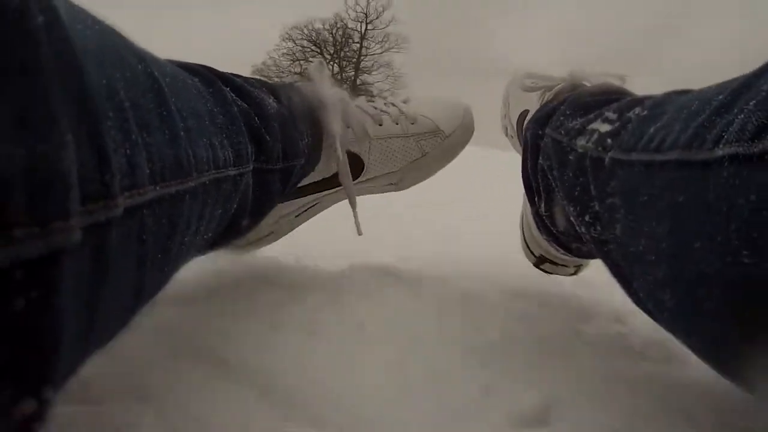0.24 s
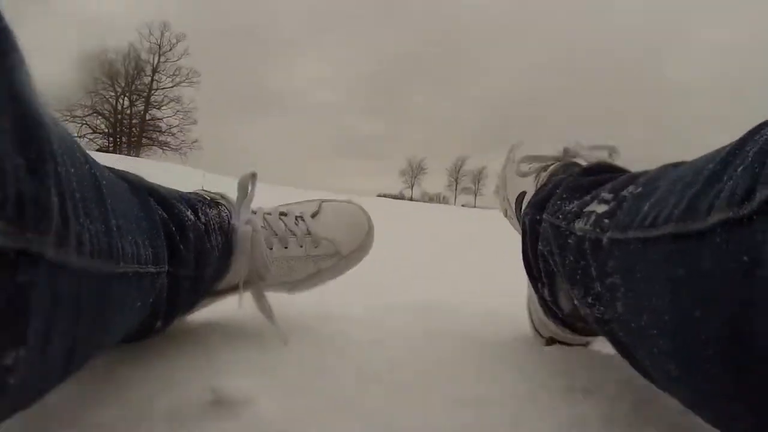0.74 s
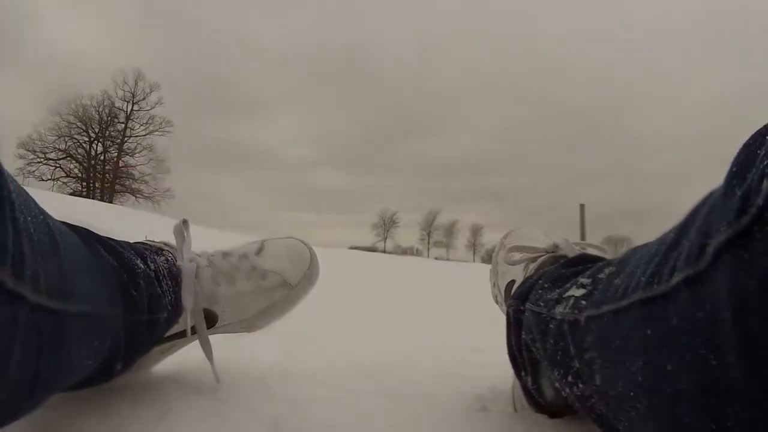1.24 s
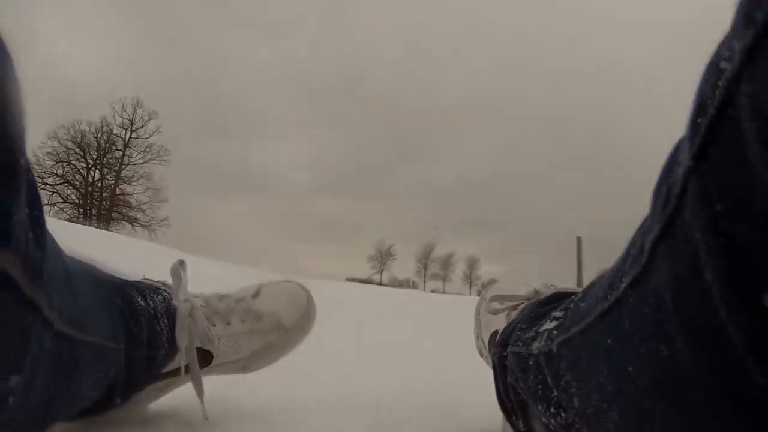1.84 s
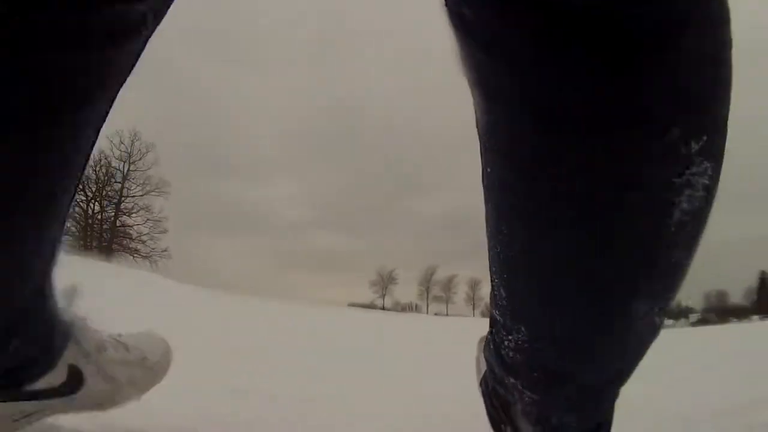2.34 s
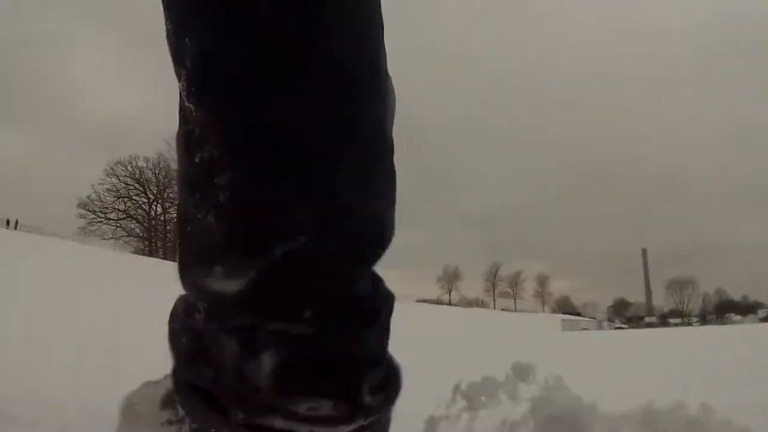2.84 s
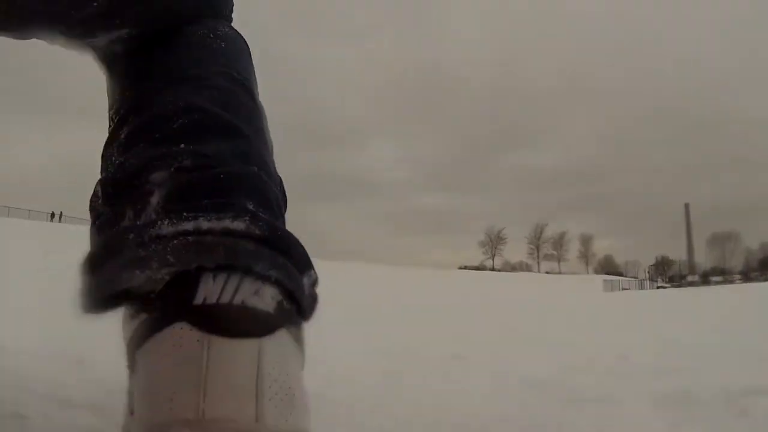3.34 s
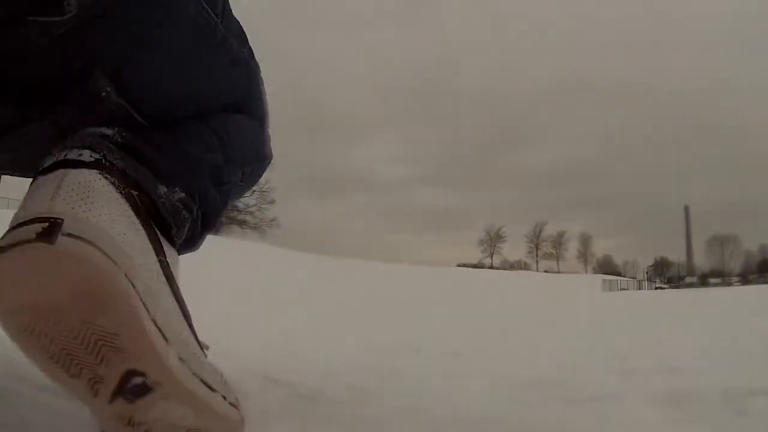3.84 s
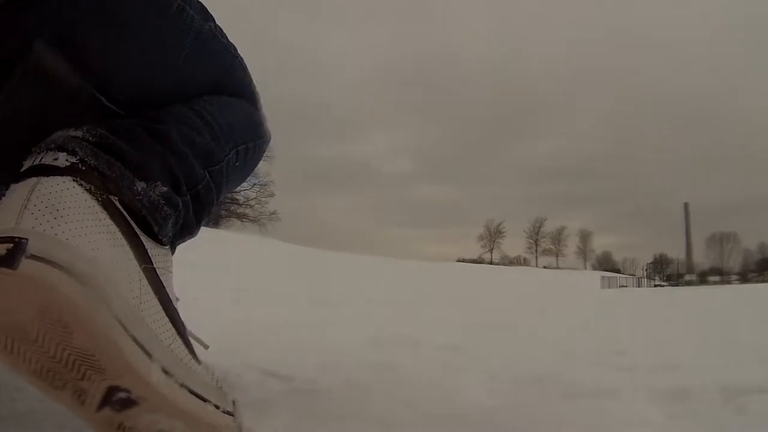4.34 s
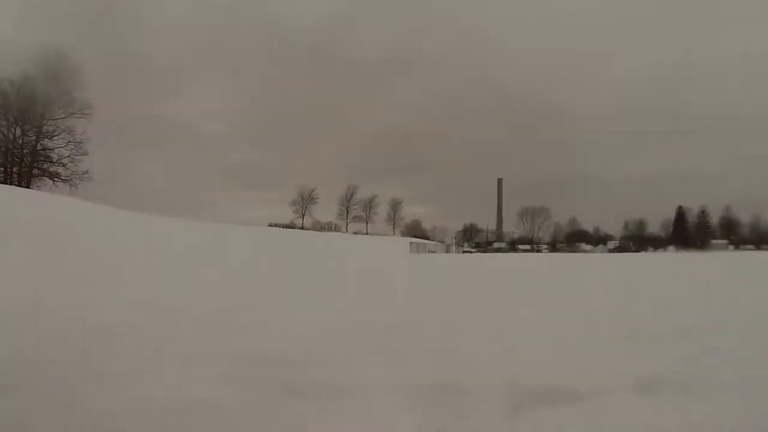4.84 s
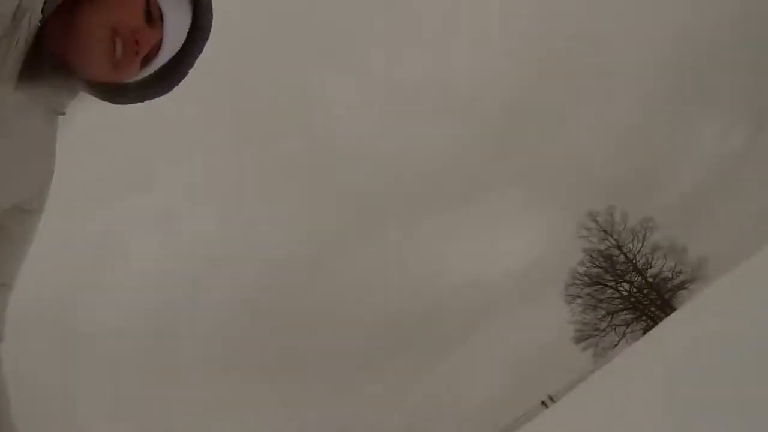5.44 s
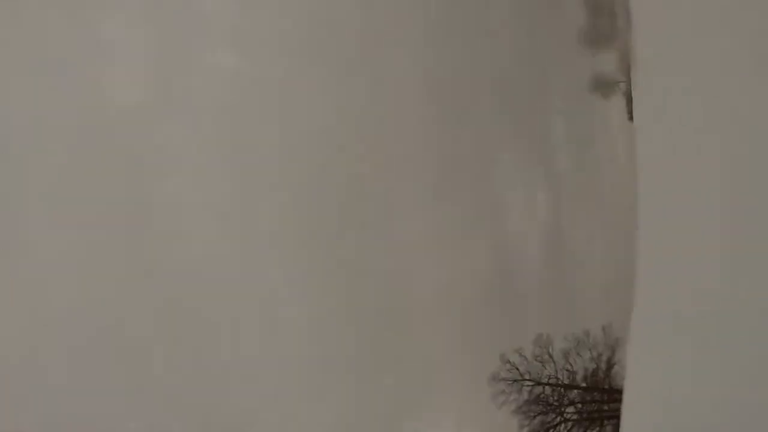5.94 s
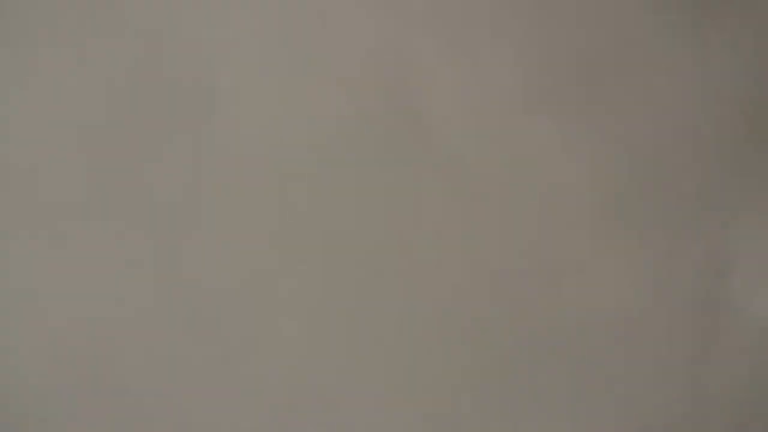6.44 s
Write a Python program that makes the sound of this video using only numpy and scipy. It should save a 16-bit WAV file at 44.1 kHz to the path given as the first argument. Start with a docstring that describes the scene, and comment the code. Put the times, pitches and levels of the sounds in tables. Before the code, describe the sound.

A sled scrapes over packed snow in uneven surges, with crunching lumps, hard hollow knocks, deep bump thumps and low wind rumble, heard from a closed case.

```python
"""From the start a sled scrapes over packed snow in surges, heard inside a hard camera case riding on it:
snapping crystals and friction, filtered by case resonances near 1.35 and 1.9 kHz, over rumbling sway and wind.
Bumps thump as single heaves, lumps crunch as grain bursts and powder fizzes; from 0.5 s hard knocks ring the hull
as dying modes, the strongest at 0.7 s overloading the recorder. Sharp ticks, dying modes with a noise click, come
sparsely from 1.5 s. A wavering 80 Hz hull shudder comes in after 4 s; ticks crowd together from 6.3 s."""
import sys
import numpy as np
from scipy import signal
from scipy.fft import rfft, irfft
from scipy.io import wavfile
from scipy.ndimage import uniform_filter1d

SR = 44100
rng = np.random.default_rng(int(sys.argv[2]) if len(sys.argv) > 2 else 0)


def unload_wav(signal):
    """Save mono or channel-first audio to the path in sys.argv[1] as 16-bit WAV at rate SR, clipped to [-1, 1]."""
    wavfile.write(
        sys.argv[1],
        SR,
        np.round(np.clip(np.atleast_2d(signal).T, -1, 1) * 32767).astype(np.int16),
    )


N = 294588

# hull bites, bears down or eases off, lifts clear:
# start_s, length_s, level_db, swell_start_to_end_db, low_grind_re_level_db, bright_hiss_re_level_db
SCRAPES = [ (0.0, 0.13, -20, -2, -4, -12), (0.134, 0.072, -30, -2, -6, -14),
           (0.187, 0.31, -23.5, 9, -5.5, -11), (0.54, 0.042, -29.5, -1, 0, -12.5),
           (0.586, 0.1, -21.5, 7, -7, -12), (0.733, 0.048, -37, 5, -3, -7),
           (0.798, 0.035, -26.5, 2, -9, -14), (0.86, 0.096, -28, 2, -5.5, -15.5),
           (1.033, 0.075, -46.5, -6, 1.5, -13), (1.145, 0.17, -39, -8.5, -5, -13.5),
           (1.343, 0.19, -43, 5, -3, -14.5), (1.593, .12, -41, -2, -2, -17),
           (1.775, 0.23, -28.5, 7.5, -1.5, -12.5), (2.051, 0.11, -27.5, 5, 0, -4),
           (2.184, 0.04, -40.5, 3, -4, -13), (2.286, 0.043, -45.5, 12, -1.5, -15),
           (2.368, 0.0093, -42, -4, 2.5, -11), (2.445, .07, -57.5, -9, 6, -3.5),
           (2.534, 0.0096, -36.5, -1.5, 2.5, -12), (2.62, 0.11, -33, 1.5, 0.5, -14.5),
           (2.74, 0.2, -49, 8, 8, -3), (2.864, 0.33, -29.5, -8.5, -3.5, -14),
           (3.228, 0.032, -24.5, -4.5, -5, -15), (3.315, 0.2, -23.5, 5, -9, -14.5),
           (3.613, 0.11, -40, 16, -2, -13), (3.678, 0.11, -33.5, 3, -5, -15.5),
           (3.819, 0.007, -23.5, -7.5, -23, -16.5), (3.857, .04, -47, 7, -2, -13),
           (3.961, 0.083, -43, 12, -3.5, -14), (4.091, 0.08, -22, 8.5, -3, -14),
           (4.213, 0.15, -31.5, 6, -12, -11.5), (4.383, 0.036, -25, -3, -7, -12.5),
           (4.504, 0.19, -28.5, -3.5, -1.5, -15), (4.646, 0.12, -17.5, 3.5, -4.5, -14.5),
           (4.79, 0.1, -18, 8.5, -4, -13.5), (4.915, 0.015, -39, 17, 6.5, -9),
           (4.971, .11, -32.5, -5, -3.5, -12.5), (5.118, 0.13, -25.5, 1.5, -3.5, -12),
           (5.348, 0.042, -47, -6, 1, -12.5), (5.418, 0.05, -37.5, 1.5, -3.5, -12),
           (5.507, 0.011, -26, -10.5, 4, -15.5), (5.574, 0.052, -32.5, -14.5, -2.5, -17),
           (5.646, 0.07, -40.5, 13, -4, -15.5), (5.726, 0.076, -25, 1.5, -4, -17.5),
           (5.859, 0.093, -25.5, 1, -2.5, -18), (5.985, 0.05, -55, -2, 14.5, -9),
           (6.16, 0.11, -44.5, -4, 0.5, -15.5), (6.352, 0.25, -56, -8, 11, -12),
           (6.6, 0.094, -38.5, -1, -7, -18)]
# fast gliding sings, slow ploughing crunches: time_s, extra_wall_ring_db, clumping_db (before CLUMP_SHARE)
GLIDE = [(0, -3.5, 5.5), (.45, 5, -4.5), (.65, 4, 5.5), (.95, 10.5, 0), (1.2, -15.5, 4), (2.1, -2.5, 2.5),
         (2.9, -9, 5), (3.4, -2, 2), (4.2, -3.5, 5), (4.8, -7, 2.5), (5.8, -11, 5), (6.6, -8, 12)]
# icy crust whistling past: peak_s, upper_ring_lift_db, half_length_s
CRUST_PATCHES = [(0.416, 3, .04), (0.934, 1, 0.048), (2.116, 1.5, 0.08)]
# snow noise, relative density: freq_hz, density_db_per_hz
SNOW_SPECTRUM = [(100, 5), (220, 3), (400, -4.5), (600, -9.5), (1000, 4.5), (2200, -2.5), (2600, -7),
                 (3300, -15), (5300, -19.5), (5900, -29), (7300, -33.5), (8300, -41), (12000, -45),
                 (15500, -61.5)]
# camera case resonances and dips: freq_hz, width_hz, lift_db
CASE_MODES = [(540, 520, 6.5), (736, 76, 6), (1028, 114, -6.5), (1368, 150, 6), (1532, 54, -8),
              (1805, 340, 6), (2030, 230, 5.5), (4420, 690, 3), (6810, 1800, 15), (9200, 2200, -3.5),
              (11000, 2000, 11)]
# snow lumps collapsing under the hull: start_s, nominal_level_db, length_s
CRUNCHES = [(0.108, -13, 0.0078), (0.203, -17.5, 0.029), (0.805, -28, 0.0069), (1.168, -29.5, 0.049),
            (1.6, -35, 0.0074), (1.608, -25.5, 0.014), (2.864, -18, 0.025), (2.887, -29, 0.016),
            (2.951, -19, 0.021), (3.061, -19.5, 0.016), (3.717, -30, .008), (3.816, -23.5, 0.0086),
            (4.386, -19, 0.017), (4.47, -28, 0.017), (4.524, -23.5, 0.021), (5.252, -12.5, 0.014),
            (5.556, -22, 0.011), (5.849, -19, 0.014)]
# powder clouds thrown on the case: peak_s, level_db (before FIZZ_DB), build_up_db_per_s, settling_db_per_s
PUFFS = [(0.0, -67, 300, 70), (0.68, -61, 40, 400), (1.22, -62, 188, 140), (2.16, -51.5, 65, 550),
         (4.88, -74, 17, 487)]
# snow rubbing on the case: start_s, length_s, level_db (before SHRILL_DB), swell_db
RUBS = [(0.0, 0.3, -45, -12), (3.201, .003, -42, -10), (4.661, 0.12, -29.5, -3), (4.835, 0.046, -38, 16)]
# powder fizz, relative density: freq_hz, density_db_per_hz
POWDER_SPECTRUM = [(3000, -20), (5000, -7.5), (7500, -8), (9000, -9), (11200, -10.5), (12500, -14),
                   (14200, -25), (15500, -22.5)]
# shrill case modes: freq_hz, width_hz, level_db
SHRILL_MODES = [(6900, 670, 7), (10870, 1500, -13)]
# hard knocks: start_s, strength_db, contact_s, spot_pitch_hz, spot_ring_re_blow_db, crunch_db
KNOCKS = [(0.5062, 0, 0.000055, 864, -8.5, -9), (0.6982, 9, 0.00015, 371, -7.5, -1.5),
          (0.8357, -1.5, 0.000056, 697, -10, -26), (1.624, -15, 0.0019, 330, -24, -23),
          (1.9965, -2, 0.0006, 830, -2, -12), (2.161, -15, 0.001, 230, 0.5, -18.5),
          (3.059, -7, 0.000052, 823, -5, -18), (4.172, -13.5, 0.000077, 282, -3, -17),
          (5.2675, -8, 0.0008, 200, -8, -7), (5.498, -25, 0.00022, 750, -9, -15.5),
          (6.228, 0, 0.0013, 777, -7, -17.5)]
# hull modes under a blow, before random variation: freq_hz, level_db, t60_s
HULL_MODES = [(262, -3.5, 0.022), (358, -2.5, 0.016), (474, -0.5, 0.012), (634, -1, 0.017),
              (756, 2.5, 0.0069), (1027, 2.5, 0.0075), (1323, -4, 0.018), (1987, -1, 0.015),
              (2990, -17, 0.021)]
# the shut case muffles the top of every blow: freq_hz, gain_db
CASE_LOSS = [(7200, -1), (8500, -2.5), (12000, -9), (15500, -26)]
# soft thumps over bumps: centre_s, peak_db (before THUMP_DB), pitch_hz
THUMPS = [(0.122, -7.5, 70.5), (0.226, -8, 65), (0.514, -4, 53.7), (0.561, -11.5, 132), (0.864, -10, 61.6),
          (1.212, -7, 61.4), (1.451, -8.5, 48.7), (1.525, -5, 75.6), (1.6275, -3, 77), (2.012, -3.5, 77),
          (2.168, -2.5, 81.7), (2.633, -6.5, 56.6), (2.89, -5.5, 113), (2.96, -8, 72), (3.527, -3, 64.4),
          (4.181, -2, 70.4), (4.498, -5, 63), (4.593, -6.5, 69), (4.748, -10, 69), (4.906, -1.5, 63),
          (4.928, -5.5, 123), (5.277, -4.5, 76.5), (5.52, -4, 69.4), (5.587, -7, 88), (5.625, -7.5, 55.4),
          (5.868, -3, 61), (6.2358, -2.5, 78.6), (6.541, -4.5, 66), (6.611, -14, 71)]
# ticks of the mount and icy crumbs; the one at 6.54 s is likely a thump overloading the recorder:
# start_s, peak_db, edge_click_re_ring_db
TICKS = [(1.525, -28, -6), (1.626, -30, -18), (2.531, -38, -15), (2.618, -22, -13), (2.624, -19.5, -8),
         (3.206, -18, -6.5), (3.719, -33, -22), (3.859, -29.5, -16), (3.887, -33.5, -5), (6.277, -42, -7),
         (6.384, -19, -25), (6.416, -29.5, -29), (6.4523, -21.5, -31), (6.5057, -40, -24),
         (6.521, -25, -24), (6.54, -34.5, 0), (6.562, -35, -26)]
# mount modes, before random variation: freq_hz, level_db, t60_s
MOUNT_MODES = [(777, -9.5, 0.031), (1213, -9, 0.016), (1260, 0, 0.028), (1910, -5, 0.027),
               (2360, -7, 0.0065), (4300, -44, .008)]
# click of a hard edge, relative density: freq_hz, density_db_per_hz
EDGE_SPECTRUM = [(500, -10), (2000, 15.5), (7000, 3), (14000, -23)]
# slow sway: time_s, level_db (before SWAY_DB)
SWAY_LEVELS = [(0.0, -27), (0.15, -21.5), (0.82, -36.5), (0.87, -20.5), (1.39, -45.5), (1.47, -24),
               (1.99, -39), (2.19, -21.5), (3.91, -18.5), (4.09, -37), (4.15, -19), (5.19, -25.5),
               (5.26, -10.5), (5.36, -56), (5.54, -25), (6.16, -26.5), (6.27, -22), (6.68, -18.5)]
# sway noise, relative density: freq_hz, density_db_per_hz
SWAY_SPECTRUM = [(1, -53), (5, -24.5), (12, -11), (22, -1), (33, 7.5), (48, 0), (62, -7), (90, -61.5),
                 (200, -88.5)]
# wind on the case: time_s, level_db (before gusts)
WIND_LEVELS = [(0.0, -28.5), (0.46, -18), (0.65, -28.5), (1.1, -36), (1.21, -49), (2.1, -23.5), (2.29, -28),
               (2.55, -46), (2.77, -34.5), (3.64, -22.5), (4.18, -32.5), (4.35, -30), (4.78, -20.5),
               (5.08, -34.5), (6.08, -27.5), (6.23, -33.5), (6.46, -28), (6.68, -21)]
# buffeting noise, relative density: freq_hz, density_db_per_hz
BUFFET_SPECTRUM = [(35, -3.5), (55, 5), (72, 3), (100, -10), (140, -17.5), (200, -24.5), (330, -31.5),
                   (700, -45.5), (2000, -80)]
# free shudder of the hull: time_s, rms_level_db
SHUDDER_LEVELS = [(4.0, -68), (4.25, -33), (4.9, -32.5), (5.28, -27), (5.42, -36), (5.6, -34), (6.0, -25.5),
                  (6.3, -40), (6.68, -25)]

TIME_S = np.arange(N) / SR
CLOCK_S = TIME_S[::32]  # coarse time for envelopes
BLOW_S = np.arange(4096) / SR  # time within one short event
HZ = np.fft.rfftfreq(N, 1 / SR)

BITE_DB_PER_S, LIFT_DB_PER_S = 899, 620  # onset of a brief contact; release of any contact
GENTLE_S = 0.19  # contacts much longer than this ease in slowly
SETTLE_DB, SETTLE_DB_PER_S = -29, 85  # loose snow rustles on after the lift
JUDDER_DB, JUDDER_HZ = 0.5, 30  # uneven snow shakes the pressure
CLUMP_SHARE = 0.44
MIDDLE_DB, GRIND_DB, HISS_DB = -1.5, -2.24, 0.2
GRIND_EDGE_HZ, HISS_EDGE_HZ = 980, 2440
WALL_HZ, WALL_WIDTH_HZ = 1940, 390
CRUST_HZ, CRUST_WIDTH_HZ, CRUST_REST_DB = 4650, 540, -22.5
FLOOR_DB = -55.5  # faint creep of snow that never stops
FIZZ_DB, SHRILL_DB, THUMP_DB, SWAY_DB = 6, -2.0, -4.0, 0.73
GUST_DB, GUST_HZ = 5.5, 5.1  # the wind comes in lumps
DRAG_DB = -4  # low buffeting re the scrape that drives it
JOLT_DB, JOLT_S = -10.5, 0.02  # shaking around a thump: re its table level; half length
SHUDDER_HZ, SHUDDER_WANDER_HZ = 80, 2
BAND_EDGE_HZ = 15500


def scrape(middle_gain, grind_gain, hiss_gain, patchy_db=3.0):
    """The hull grinds over snow: deep snow gives more grind, icy crust more hiss."""
    wall_db, clump_db = curves(GLIDE)
    grains = crunch(per_s=2200, spread_db=0.0, smooth_db=0, clump_db=CLUMP_SHARE * clump_db, clump_hz=94)
    snow = patchy(in_case(grains), patchy_db)
    wall = resonate(snow, bell(WALL_HZ, WALL_WIDTH_HZ))
    crust = resonate(snow, bell(CRUST_HZ, CRUST_WIDTH_HZ))
    crust_gain = amp(CRUST_REST_DB) + together([hump(*row) for row in CRUST_PATCHES])

    upper = above(snow, GRIND_EDGE_HZ)
    top = above(snow, HISS_EDGE_HZ)
    middle = steadied(upper - top + amp(wall_db) * wall, samples=1600)
    grind = steadied(snow - upper, samples=1300)
    hiss = steadied(top + crust_gain * crust, samples=1300)

    sliding = amp(MIDDLE_DB) * middle_gain * middle
    sliding += amp(GRIND_DB) * grind_gain * grind
    sliding += amp(HISS_DB) * hiss_gain * hiss
    creep = amp(FLOOR_DB) * in_case(rng.standard_normal(N))
    return sliding + creep


def pressure():
    """Envelopes of the scraping's middle, low grind and bright hiss, sharing one judder."""
    gains = np.array([contact(*row[:4]) for row in SCRAPES])
    *_, grind_db, hiss_db = np.transpose(SCRAPES)
    grind_gains = gains * amp(grind_db)[:, None]
    hiss_gains = gains * amp(hiss_db)[:, None]
    judder = amp(JUDDER_DB * wander(JUDDER_HZ))
    return [judder * together(band) for band in (gains, grind_gains, hiss_gains)]


def contact(start_s, length_s, level_db, swell_db):
    """Gain of one contact with the snow: a bite, a steady swell or fade, a quick lift and a faint rustle."""
    t = CLOCK_S - start_s
    before_s = np.maximum(-t, 0)
    after_s = np.maximum(t - length_s, 0)
    held_db = level_db + swell_db * (np.clip(t / length_s, 0, 1) - 0.5)
    bite_db = -before_s * BITE_DB_PER_S / (1 + (length_s / GENTLE_S) ** 2)
    lift_db = np.maximum(-LIFT_DB_PER_S * after_s, SETTLE_DB - SETTLE_DB_PER_S * after_s)
    return amp(held_db + bite_db + lift_db)


def crunch(per_s, spread_db, smooth_db, clump_db, clump_hz):
    """Snow crystals snapping in clumps over smooth friction."""
    struck = rng.random(N) < per_s / SR
    sign = rng.choice([-1, 1], N)
    size_db = spread_db * np.minimum(rng.exponential(1, N), 4)
    snaps = evened(struck * sign * amp(size_db))
    friction = amp(smooth_db) * rng.standard_normal(N)
    return evened((snaps + friction) * amp(clump_db * wander(clump_hz)))


def in_case(x):
    """Snow noise as it sounds through the resonant camera case."""
    case_db = sum(lift_db * bell(hz, width_hz) for hz, width_hz, lift_db in CASE_MODES)
    return evened(colour(x, spectrum(SNOW_SPECTRUM) + case_db))


def patchy(x, depth_db, frames=7):
    """Each lump of snow briefly favours its own pitches; the fine hiss above them stays smoother."""
    hz, _, z = signal.stft(x, SR, nperseg=512, noverlap=384)
    patches = rng.standard_normal(z.shape[::-1]).T
    for _ in range(2):
        patches = uniform_filter1d(patches, size=frames, axis=1)
        patches = uniform_filter1d(patches, size=3, axis=0)
    z = z * amp(depth_db * evened(patches) / (1 + (hz[:, None] / 3500) ** 2))
    return signal.istft(z, SR, nperseg=512, noverlap=384)[1][:N]


def knocks(crunch_s=0.0044, spot_t60_s=0.034):
    """Hard lumps strike the hull and are crushed; each spot has its own note, longer contact sounds duller."""
    out, t = np.zeros(N), BLOW_S
    crushed = in_case(rng.standard_normal(N))
    for start_s, strength_db, contact_s, spot_hz, spot_db, crunch_db in KNOCKS:
        push = np.exp(-t / contact_s)
        blow = signal.fftconvolve(ring(HULL_MODES, t), push)[:len(t)]
        blow /= abs(blow).max()
        spot = ring([(spot_hz, 0, spot_t60_s)], t) * (1 - push)
        burst = crushed[round(start_s * SR):][:len(t)] * np.exp(-t / crunch_s)
        add(out, start_s, amp(strength_db) * (blow + amp(spot_db) * spot) + amp(crunch_db) * burst)
    return colour(out, spectrum(CASE_LOSS))


def thumps():
    """Each bump heaves the sled once: a push between two softer rebounds."""
    out = np.zeros(N)
    half = len(BLOW_S) // 2 / SR
    for centre_s, peak_db, pitch_hz in THUMPS:
        u = np.pi * pitch_hz * (BLOW_S - half)
        heave = (2 * u ** 2 - 1) * np.exp(-u ** 2)
        add(out, centre_s - half, amp(peak_db) * heave)
    return amp(THUMP_DB) * out


def crunches(rise_s=0.0033):
    """A lump gives way in a quick rush of coarse grains."""
    envelope, t = np.zeros(N), BLOW_S
    for start_s, level_db, length_s in CRUNCHES:
        rush = (1 - np.exp(-t / rise_s)) * np.exp(-(t / length_s) ** 2)
        add(envelope, start_s, amp(level_db) * rush)
    grains = crunch(per_s=1000, spread_db=5.5, smooth_db=1.5, clump_db=3.5, clump_hz=150)
    return envelope * steadied(in_case(grains), samples=600)


def spray():
    """Fine powder fizzes against the case; where it rubs hard, the case rings shrilly."""
    grains = crunch(per_s=2600, spread_db=5.5, smooth_db=2.0, clump_db=2.4, clump_hz=60)
    fizz = evened(colour(grains, spectrum(POWDER_SPECTRUM)))
    modes = sum(amp(level_db) * bell(hz, width_hz) for hz, width_hz, level_db in SHRILL_MODES)
    shrill = evened(resonate(grains, modes))
    powder = together([puff(*row) for row in PUFFS])
    rubbing = together([contact(*row) for row in RUBS])
    return amp(FIZZ_DB) * powder * fizz + amp(SHRILL_DB) * rubbing * shrill


def puff(peak_s, level_db, build_db_per_s, settle_db_per_s):
    """Gain of one powder cloud: builds up and settles at steady dB rates."""
    t = CLOCK_S - peak_s
    return amp(level_db - np.maximum(-build_db_per_s * t, settle_db_per_s * t))


def ticks(edge_s=0.002):
    """Small sharp ticks: dying mount modes plus a short noise click of the edge."""
    out, t = np.zeros(N), BLOW_S
    grit = evened(colour(rng.standard_normal(N), spectrum(EDGE_SPECTRUM)))
    for start_s, peak_db, edge_db in TICKS:
        edge = grit[round(start_s * SR):][:len(t)] * np.exp(-t / edge_s)
        add(out, start_s, amp(peak_db) * (ring(MOUNT_MODES, t) + amp(edge_db) * edge))
    return colour(out, spectrum(CASE_LOSS))


def rumble(drag):
    """The sled sways; wind, drag and every bump buffet the case; the hull shudders at its own pitch."""
    sway = steadied(colour(rng.standard_normal(N), spectrum(SWAY_SPECTRUM)), samples=3000)
    sway_gain = amp(curves(SWAY_LEVELS)[0] + SWAY_DB)

    buffet = steadied(colour(rng.standard_normal(N), spectrum(BUFFET_SPECTRUM)), samples=2000)
    wind = amp(curves(WIND_LEVELS)[0] + GUST_DB * wander(GUST_HZ))
    jolts = together([hump(centre_s, peak_db + JOLT_DB, JOLT_S) for centre_s, peak_db, _ in THUMPS])
    shaking = np.sqrt(wind ** 2 + (amp(DRAG_DB) * drag) ** 2 + jolts ** 2)

    pitch_hz = SHUDDER_HZ * (1 + 0.02476 * wander(SHUDDER_WANDER_HZ))
    shudder = np.sqrt(2) * np.sin(2 * np.pi * np.cumsum(pitch_hz) / SR)
    return sway_gain * sway + shaking * buffet + amp(curves(SHUDDER_LEVELS)[0]) * shudder


def ring(modes, t, vary_db=1.65):
    """Dying modes after a blow, varied each time; neighbours swing in opposite directions. Peak 1."""
    x = np.zeros(len(t))
    for k, (hz, level_db, t60_s) in enumerate(modes):
        fade = amp(level_db + vary_db * rng.normal() - 60 * t / t60_s)
        varied_hz = hz * rng.uniform(0.97, 1.01)
        x += (-1) ** k * fade * np.sin(2 * np.pi * varied_hz * t)
    return x / abs(x).max()


def bell(hz, width_hz):
    """Shape of one resonance over all frequencies, top 1."""
    return 1 / (1 + (2 * (HZ - hz) / width_hz) ** 2)


def resonate(x, gain):
    """Filters by a linear gain for every frequency."""
    return irfft(rfft(x) * gain, N)


def colour(x, gain_db):
    """Filters by a gain in dB for every frequency."""
    return resonate(x, amp(gain_db))


def above(x, edge_hz):
    """The part of x over a smooth crossover."""
    return resonate(x, 1 - 1 / (1 + (HZ / edge_hz) ** 8))


def spectrum(points):
    """A dB table read on a log-frequency axis."""
    hz, db = np.transpose(points)
    return np.interp(np.log(HZ + 1), np.log(hz), db)


def curves(rows):
    """Each column of a time table, sample by sample."""
    time_s, *columns = np.transpose(rows)
    return [np.interp(TIME_S, time_s, column) for column in columns]


def hump(peak_s, level_db, half_s):
    """Gain of a rounded swell."""
    return amp(level_db) * np.exp(-((CLOCK_S - peak_s) / half_s) ** 2)


def together(gains):
    """Adds envelopes by their power, sample by sample."""
    return np.interp(TIME_S, CLOCK_S, np.sqrt(np.sum(np.square(gains), axis=0)))


def wander(rate_hz):
    """Smooth random drift of rms 1, mostly below the given rate."""
    return evened(resonate(rng.standard_normal(N), 1 / (1 + (HZ / rate_hz) ** 4)))


def steadied(x, samples):
    """Evens out the slow swells of a noise, leaving its quick ones."""
    power = uniform_filter1d(uniform_filter1d(x ** 2, samples), samples)
    return evened(x / np.sqrt(abs(power) + 1e-12))


def evened(x):
    """Scales to rms 1."""
    return x / np.sqrt(np.mean(x ** 2) + 1e-20)


def amp(db):
    """Decibels to gain."""
    return 10 ** (np.asarray(db) / 20)


def add(mix, start_s, sound):
    """Mixes a sound in at its start time."""
    part = mix[round(start_s * SR):][:len(sound)]
    part += sound[:len(part)]


def scene():
    """Everything reaches one microphone inside the case; both channels are equal."""
    middle, grind, hiss = pressure()
    mono = scrape(middle, grind, hiss)
    mono = mono + knocks() + thumps() + crunches() + spray() + ticks() + rumble(middle)
    return np.array([mono, mono])


def record(dry):
    """The recorder saturates on the hardest knocks, then limits the band."""
    clipped = dry / (1 + dry ** 8) ** (1 / 8)
    lowpass = signal.firwin(511, BAND_EDGE_HZ, window=("kaiser", 9), fs=SR)
    return signal.oaconvolve(clipped, lowpass[None], "same")


dry = scene()
out = record(dry)
unload_wav(out)
```